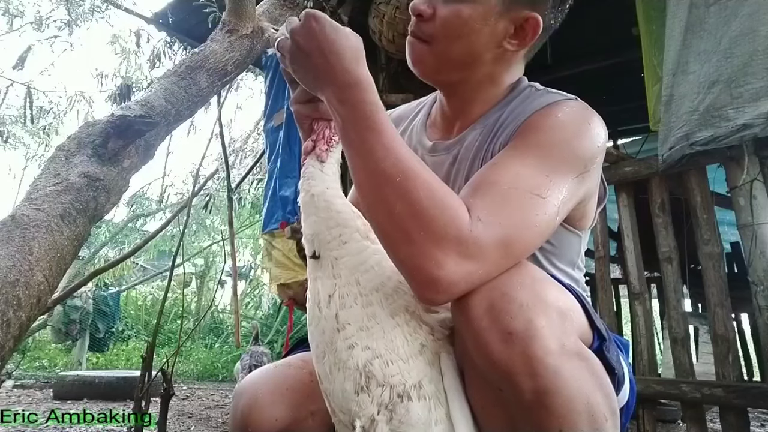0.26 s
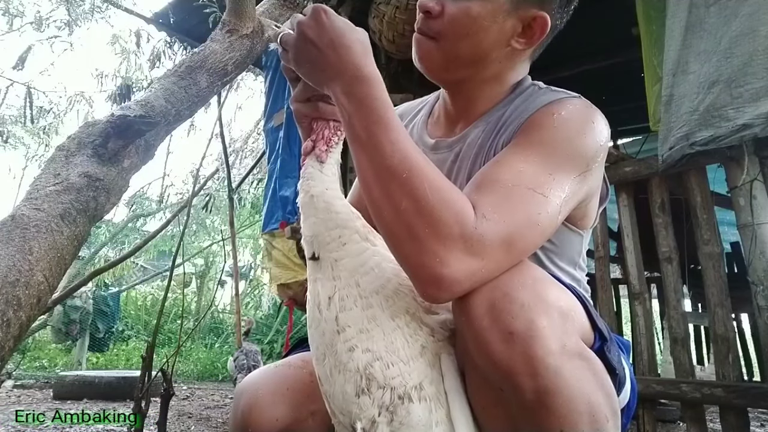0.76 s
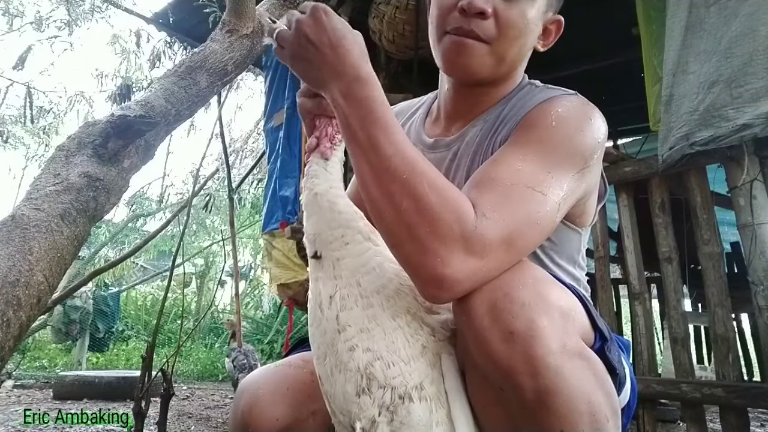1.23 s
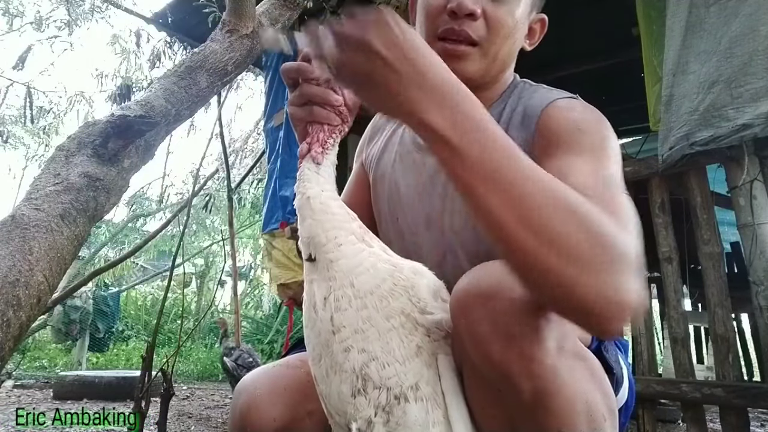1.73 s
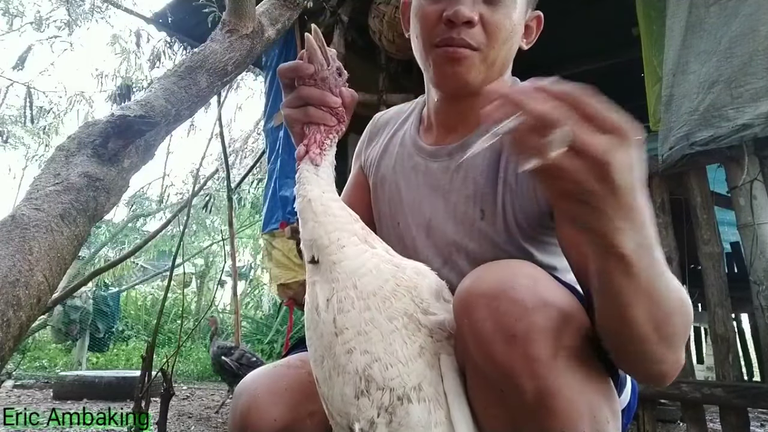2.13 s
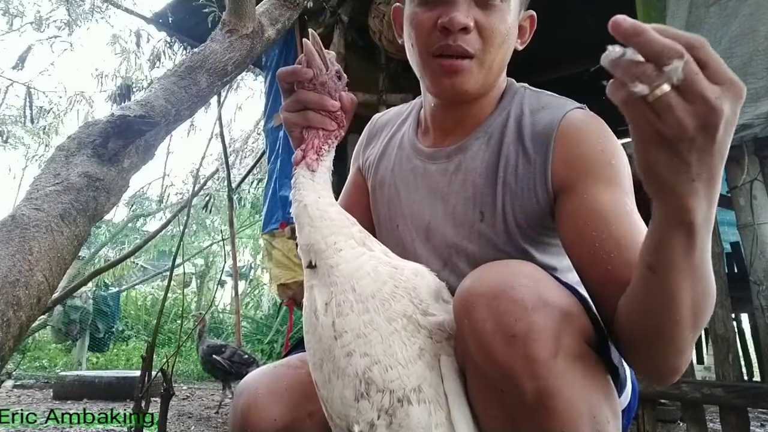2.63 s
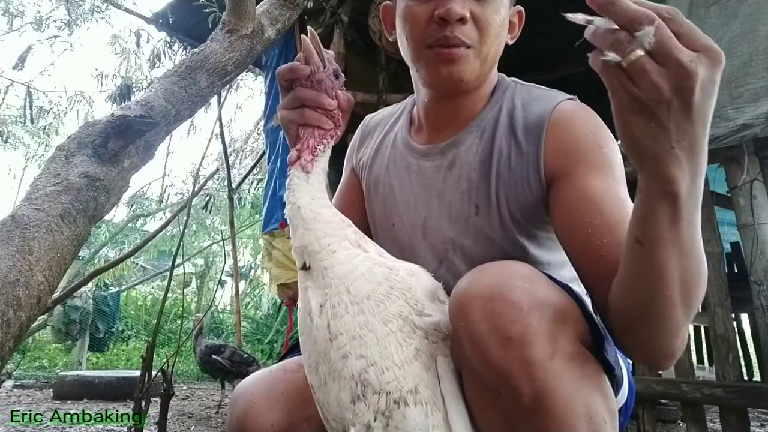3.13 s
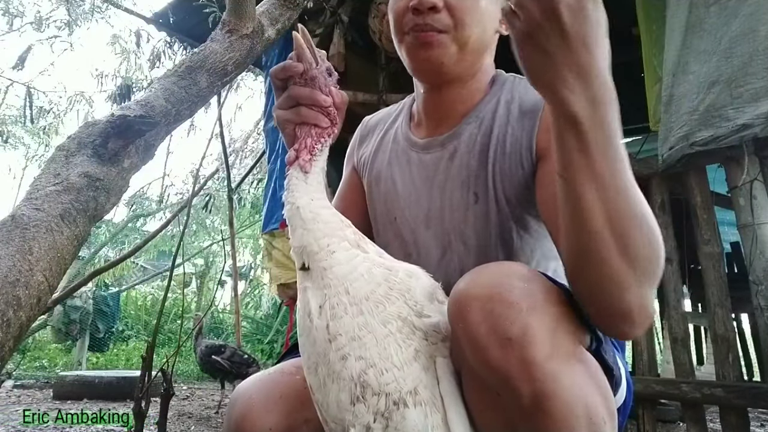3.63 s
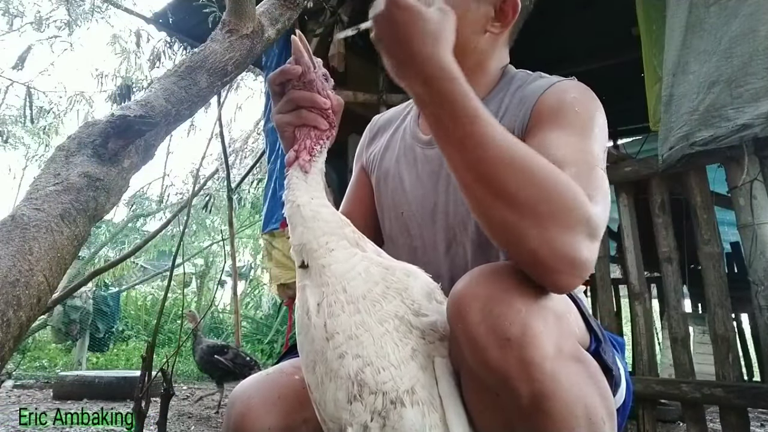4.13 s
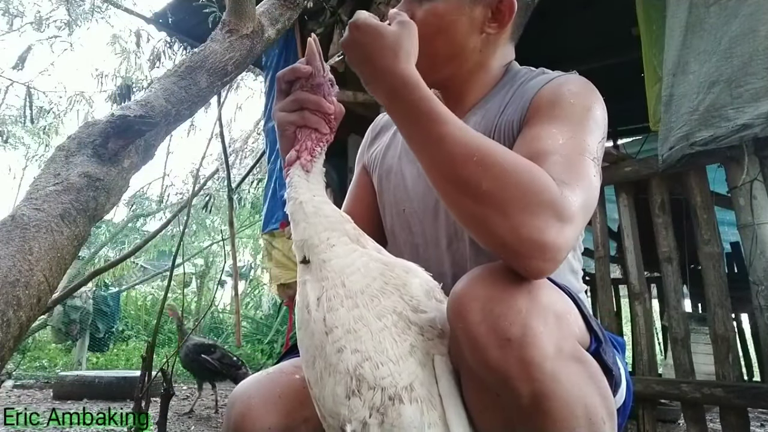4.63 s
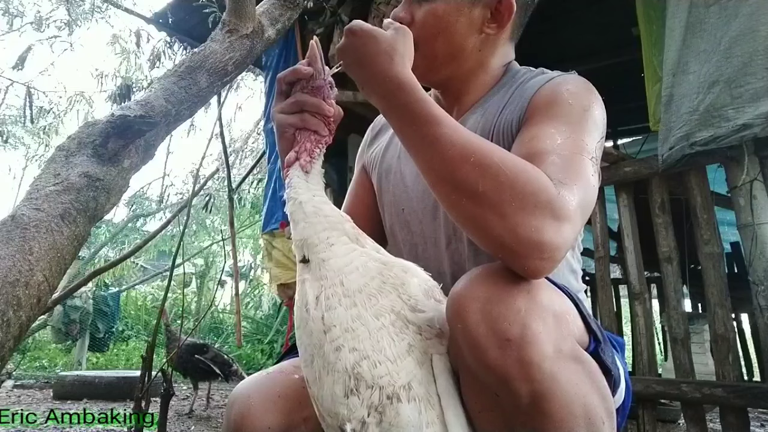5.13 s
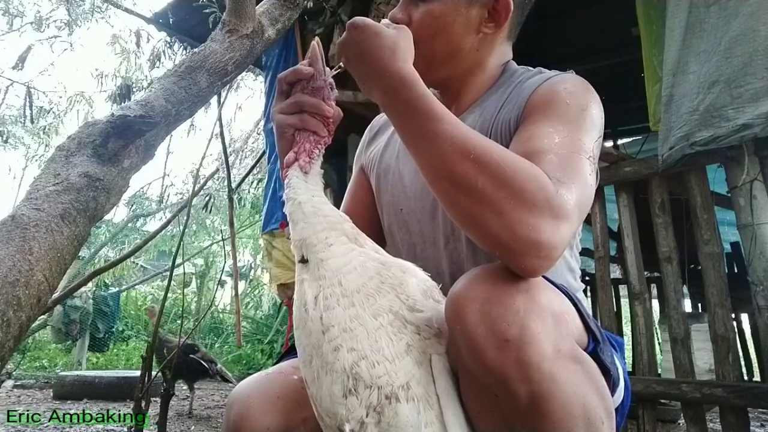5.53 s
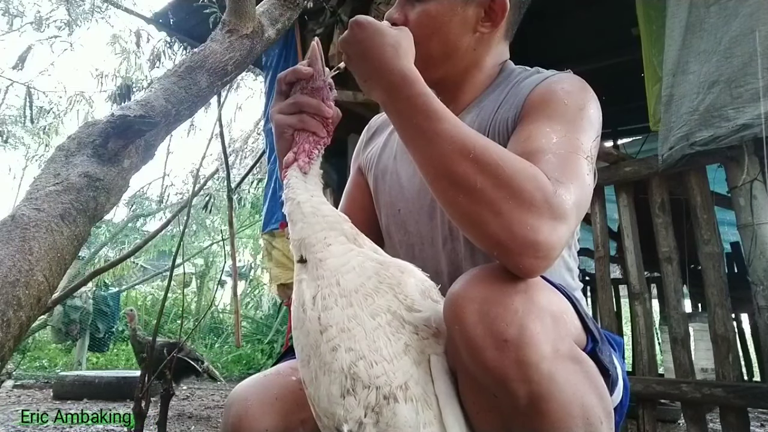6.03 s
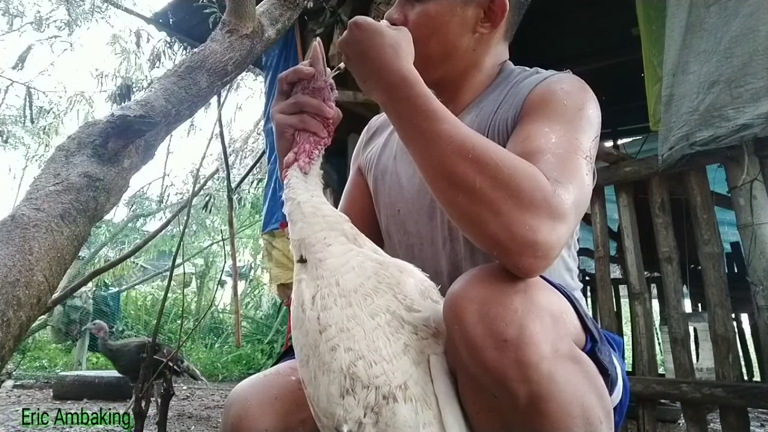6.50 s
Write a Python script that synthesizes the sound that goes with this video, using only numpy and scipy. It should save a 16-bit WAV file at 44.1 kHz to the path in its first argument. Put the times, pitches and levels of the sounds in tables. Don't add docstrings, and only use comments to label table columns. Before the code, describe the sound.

Outdoors in a backyard, steady rain hisses over a low rumble. A near turkey yelps in short bursts, each opening with a raspy puff, ringing into a whistle and breaking low. Farther hens chirp, pipe and cluck between, and a chick peeps thinly early on. Drops tick on leaves and tarp. Hand-held phone, close, slightly overloaded.

```python
import sys
import numpy as np
from scipy import signal
from scipy.fft import rfft, irfft
from scipy.io import wavfile
from scipy.ndimage import uniform_filter1d, minimum_filter1d

SR = 44100
rng = np.random.default_rng(int(sys.argv[2]) if len(sys.argv) > 2 else 0)


def makeup_ratio(level_db):
    decades = np.asarray(level_db, float) / 20
    return 10 ** decades


def to_wav(sig):
    pcm = np.clip(np.atleast_2d(sig), -1, 1) * 32767
    pcm = np.round(pcm).astype(np.int16)
    wavfile.write(sys.argv[1], SR, pcm.T)


N = 298116

# left_lag_samples, left_minus_right_db
PLACES = [
    (19, 1),
    (8, 3.5),
]


def read(table, hz):
    f, db = np.transpose(table)
    return np.interp(np.log(hz), np.log(f), db)


def band(x, lo_hz, hi_hz):
    sos = signal.butter(2, [lo_hz, min(hi_hz, .49 * SR)], "bandpass", fs=SR, output="sos")
    y = signal.sosfilt(sos, x)
    return y / np.sqrt(np.mean(y ** 2))


def walk(rate_hz, size=N):
    k = max(int(SR / rate_hz), 1)
    held = np.repeat(rng.standard_normal(size // k + 1), k)
    return 2.78 * uniform_filter1d(uniform_filter1d(held, k), k)[:size]


def add(out, start_s, sound, lag, pan_db):
    for ear, (late, db) in enumerate([(max(lag, 0), pan_db / 2), (max(-lag, 0), -pan_db / 2)]):
        i = int(start_s * SR + late)
        n = min(len(sound), N - i)
        out[ear, i:i + n] += makeup_ratio(db) * sound[:n]


def rain():
    # time_s, level_db
    shower_db = [
        (0.0, -53),
        (1.62, -53),
        (5.12, -52.5),
        (5.29, -50),
        (6.14, -54),
        (6.76, -50.5),
    ]
    # freq_hz, density_db
    rumble_db = [(15, -24), (25, -18), (43, -21.5), (63, -8), (87, 1), (329, -17.5), (367, -19)]
    # freq_hz, density_db
    hiss_db = [(764, -18), (1250, -21), (2450, -24.5), (3790, -33.5), (6890, -30.5), (10100, -40),
               (14700, -41.5), (16400, -23)]
    patter_per_s, patter_spread_db = 600, 4.0
    alike_hz, spectrum_db = 540, 39
    swell_db, flicker_db = .55, 1.1

    s, level_db = np.transpose(shower_db)
    shower = np.interp(np.arange(N) / SR, s, level_db)
    strength = makeup_ratio(patter_spread_db * np.minimum(rng.exponential(size=(2, N)), 5))
    hits = (rng.random((2, N)) < patter_per_s / SR) * strength
    patter = hits * rng.standard_normal((2, N))
    hiss = 0.46 * patter / patter.std() + rng.standard_normal((2, N))

    hz = np.maximum(np.fft.rfftfreq(N, 1 / SR), 1)
    alike = 1 / (1 + (hz / alike_hz) ** 2.26)
    common = rfft(rng.standard_normal(N))
    mix = np.sqrt(alike) * common + np.sqrt(1 - alike) * rfft(hiss / hiss.std())
    mix *= makeup_ratio(read(rumble_db + hiss_db, hz) + spectrum_db + shower.mean())

    gust = shower - shower.mean() + swell_db * walk(30)
    out = 0
    for step in np.arange(8, 30):
        share = np.clip(1 - abs(2 * np.log2(hz) - step), 0, 1)
        db = flicker_db * walk(25) + np.clip((step - 16) / 4, 0, 1) * gust
        out = out + makeup_ratio(db) * irfft(mix * share, N)
    return out


def call(rows, turn_db):
    # freq_hz, level_db
    beak = [(600, -22.5), (2000, -11), (3200, -24), (4600, -32), (6400, -25), (8500, -43.5), (15000, -64)]
    edge_s, burst_s, tail_db = .0043, .024, -15
    jitter, flutter_db, croak_db = .005, .6, -17
    bright_db_per_hz = .048

    s, *columns, starts = np.transpose(rows)
    t = np.arange(s[0] - edge_s, s[-1] + edge_s, 1 / SR)
    n = len(t)
    hz, first_db, second_db, third_db, brass_db, rasp_db = (np.interp(t, s, c) for c in columns)
    turn = turn_db[(t * SR).astype(int).clip(0, N - 1)]
    second_db = second_db + bright_db_per_hz * np.clip(hz - 1000, -120, 150) + turn
    third_db = third_db + turn
    since_s = t - starts[np.maximum(np.searchsorted(s, t) - 1, 0)] + edge_s

    phase = 2 * np.pi * np.cumsum(hz * (1 + jitter * walk(175.4, size=n))) / SR
    tone = np.sin(phase) + makeup_ratio(second_db + flutter_db * walk(184.0, size=n)) * np.sin(2 * phase)
    tone += makeup_ratio(third_db) * np.sin(3 * phase)
    tone += makeup_ratio(third_db - 7) * np.clip((3000 - 4 * hz) / 400, 0, 1) * np.sin(4 * phase)

    effort = makeup_ratio(first_db) * (1 + makeup_ratio(second_db))
    puff = uniform_filter1d(np.exp(-(since_s / burst_s) ** 4 / 2), size=90) + makeup_ratio(tail_db)
    burst = (1 + makeup_ratio(second_db)) * np.minimum(effort / 0.5, 1) * puff
    for k in range(4, 14):
        db = brass_db + read(beak, k * hz) + 3 * walk(229.7, size=n)
        tone += burst * makeup_ratio(db) * np.sin(k * phase) * (k * hz < .45 * SR)

    air = rfft(rng.standard_normal(n))
    air = irfft(air * makeup_ratio(read(beak, np.fft.rfftfreq(n, 1 / SR) + 1)), n)
    air = 0.83 * band(air * (1 + np.cos(phase)), 900, 17000)
    croak = makeup_ratio(third_db + croak_db) * np.clip((850 - hz) / 150, .2, 1)
    tone = np.sqrt(2) * tone + (burst * makeup_ratio(rasp_db) + croak) * air
    edge = np.clip(np.minimum(t - t[0], t[-1] - t) / edge_s, 0, 1) ** 2
    return t[0], tone * edge * makeup_ratio(first_db + flutter_db * walk(118.3, size=n))


def syllable(shape, start_s, length_s, from_hz, to_hz, level_db):
    join_s = .002
    return [(start_s + join_s + when * (length_s - 2 * join_s), from_hz + glide * (to_hz - from_hz),
             level_db + rel_db, *upper)
            for when, glide, rel_db, *upper in shape]


def phrases(bird, breath_s):
    parts = sorted((*row, shape, brass_db, rasp_db)
                   for rows, shape, brass_db, rasp_db in bird for row in rows)
    out, end = [], -1
    for (s, length, *rest, shape, brass_db, rasp_db), later in zip(parts, parts[1:] + [(99,)]):
        if s - end > breath_s:
            out.append([])
        end = s + length
        if breath_s > 0:
            end = min(end, later[0])
        out[-1] += [(*row, brass_db, rasp_db, s) for row in syllable(shape, s, end - s, *rest)]
    return out


def far_birds():
    # length_share, glide_share, level_db, second_minus_first_db, third_minus_first_db
    falls = [(0.02, .1, 1070, 1030, -46), (0.12, .055, 1030, 640, -44), (0.32, .04, 1200, 1120, -45),
             (0.54, .035, 1250, 1180, -45), (0.69, .05, 1050, 720, -46), (1.75, .11, 1130, 800, -46),
             (3.692, .028, 1420, 555, -30), (3.792, .02, 1360, 850, -31), (4.34, .055, 1170, 1060, -47),
             (4.385, .03, 680, 560, -45), (4.475, .04, 1180, 1130, -46), (4.668, .02, 770, 720, -44),
             (4.76, .055, 1160, 1130, -49), (6.232, .072, 1850, 1500, -45), (6.457, .03, 1250, 587, -34),
             (6.472, .03, 1870, 1720, -40)]
    fall = [(0, 0, 0, -20, -36), (.45, 0.25, 1, -18, -34), (1, 1, -3, -20, -30)]
    clucks = [(0.25, 0.019, 740, 804, -40), (0.482, 0.018, 710, 840, -37.5),
              (1.885, 0.032, 652, 870, -36.5), (3.4, 0.0086, 398, 412, -36.5),
              (4.455, 0.018, 706, 860, -38), (5.08, 0.031, 874, 920, -48), (6.135, 0.022, 892, 945, -44.5)]
    cluck = [(0, 0.1, 5.5, 3, -7), (.35, 0.18, 2, -7.5, -26), (0.999, 0.88, 6.5, -1, -37)]
    chirps = [(0.255, 0.024, 1090, 1260, -42), (1.006, 0.072, 866, 1266, -30.5),
              (2.102, 0.027, 848, 1324, -21), (2.19, 0.022, 754, 1100, -29),
              (3.677, 0.013, 1089, 1435, -21.5), (3.722, 0.026, 684, 900, -38),
              (3.748, .045, 876, 1380, -23.5), (6.385, 0.083, 809, 1370, -29),
              (6.445, 0.022, 1640, 1800, -34.5)]
    chirp = [(0, 0, -6, -20, -28), (.45, .22, 3, -18, -26), (.7, .45, -2, -20, -26), (.9, .9, -1, -20, -26),
             (1, 1, -5, -22, -28)]
    pipes = [
        (0.748, 0.15, 929, 990, -35.5),
        (3.47, 0.16, 964, 1048, -31.5),
        (6.158, 0.16, 932, 1004, -35),
    ]
    pipe = [(0, -4, 5.5, -21, -35), (.13, -3, -1.5, -1, -35), (.17, -0.5, 7, -19, -40),
            (0.598, 0.25, 8, -14, -40), (.92, 1, 5, -38, -16), (0.998, 1, 2, -34, -31)]
    helds = [
        (0.958, 0.0371, 630, 715, -34.5),
        (1.905, 0.13, 888, 994, -22),
    ]
    held = [(0, 0.079, -13, -3, -18), (.4, .5, -4, -2, -26), (1, 1, -3, -9, -33)]
    putts = [
        (6.495, .042, 650, 580, -19.5),
        (5.05, 0.0176, 1600, 700, -29.5),
        (6.624, 0.017, 774, 600, -23.5),
        (6.592, 0.0082, 1500, 1900, -36),
    ]
    putt = [(0, 0.13, -3, -16, -22), (.22, .1, 3, 0.5, -11), (.5, 0, -7.5, -8, -30), (1, 1, -13, -2, -30)]
    # events, shape, brass_db, rasp_db
    voices = [(pipes, pipe, -20, -16), (chirps, chirp, -22.5, -7), (falls, fall, -20, -14),
              (clucks, cluck, -14, -10), (helds, held, -20, -20), (putts, putt, -20, -16)]
    out = np.zeros((2, N))
    for rows in phrases(voices, -9):
        add(out, *call(rows, np.zeros(N)), *PLACES[1])
    return out


def chick():
    # start_s, length_s, pitch_hz, level_db
    peeps = [(0.413, 0.094, 7200, -47), (0.718, .06, 7470, -50), (0.812, .05, 6320, -47),
             (1.157, 0.081, 7120, -44), (1.615, 0.076, 7170, -45), (1.698, 0.064, 7040, -46),
             (2.25, .085, 7120, -48), (2.336, 0.045, 7370, -45)]
    out = np.zeros((2, N))
    for start_s, length_s, pitch_hz, level_db in peeps:
        n = int(length_s * SR)
        hz = pitch_hz * (1 + .007 * walk(250, size=n))
        level = np.hanning(n) ** 0.082 * makeup_ratio(level_db + 2.3 * walk(79, size=n))
        add(out, start_s, np.sin(2 * np.pi * np.cumsum(hz) / SR) * level, 10, -7)
    return out


def splash(start_s, peak_db, low_db, pan_db, hz, t60_s, rise_s):
    t, out = np.arange(SR // 5) / SR, np.zeros((2, N))
    noise = rng.standard_normal((2, len(t)))
    bright = band(noise[0], hz / 3.7, hz * 1.4)
    knock = band(band(noise[1], 331, 1720), 246, 1900)
    decay = makeup_ratio(-60 * t / t60_s) * np.clip(t / rise_s, 0, 1)
    add(out, start_s, makeup_ratio(peak_db + 6.5) * (bright + makeup_ratio(low_db) * knock) * decay, -2.5 * pan_db, pan_db)
    return out


def drops():
    # start_s, peak_db, low_minus_peak_db, left_minus_right_db
    leaf_drops = [(0.5252, -48, -12, 12), (0.5894, -49.5, 15.5, 3), (0.6994, -48.5, 14, 6.5),
                  (0.9203, -47, -10, -13), (1.6054, -40, -5, 5), (1.8956, -46, 3, 7), (2.0574, -62, 8, 6),
                  (2.0867, -51, 19, 5), (2.2655, -47, -13, 9), (2.4006, -41.5, -7, 5.5),
                  (2.785, -39, -23, 6.5), (2.9966, -43.5, -11, 2), (3.2599, -43.5, 19, 3.5),
                  (3.3323, -46, -16, 5.5), (3.4016, -40, -11, 9), (3.427, -48, 23, 7),
                  (4.0051, -44.5, 20, 5), (4.1599, -48, 12, 5), (4.3814, -54.5, 21.5, 5),
                  (4.5374, -57, 23.5, 4), (5.4924, -45, -13, 7), (5.7618, -58, -5, 3), (5.8431, -49, 3, 6),
                  (5.892, -45, -10, 9), (6.115, -60, 22, 3), (6.33, -54, 7, 0), (6.376, -49, 24.5, 4.5),
                  (6.539, -51, 11, 1)]
    ticks = [
        (2.4793, -37.5, -14, 7.7),
        (2.8564, -41, 5, 2.8),
        (2.9168, -45, -5, 4.5),
        (6.264, -43, 9, 6.1),
    ]
    spills = [(1.8395, -50, 6, 8), (2.1895, -48.5, 8, 11), (3.1123, -52.5, 7, 9), (4.0681, -49.5, 7.5, 9.5),
              (4.811, -53, -16, 6), (4.8306, -45.5, 5.5, 9.5), (4.8596, -48.5, 4, 7),
              (5.7986, -62, -15, 13), (5.8427, -60.5, 17, 5.5), (6.0493, -46.5, 7.5, 6),
              (6.4107, -47.5, 8.5, 7)]
    out = np.zeros((2, N))
    for rows, hz in [(leaf_drops, 6300), (ticks, 15000)]:
        for row in rows:
            out += splash(*row, hz, .016, .0002)
    for row in spills:
        out += splash(*row, 5500, .15, .00029)
    return out


def dips(x):
    # port (0 left, 1 right), centre_hz, width_hz
    bands = [
        (0, 1125, 130),
        (1, 1030, 120),
        (0, 1000, 300),
        (0, 2150, 500),
    ]
    # time_s, then one depth_share (0-1) per band
    depth_share = [(2, 0.77, 0.85, 0.0082, .4), (2.199, 0, 0.33, 0.8, 0.38), (2.9, 0.078, 0, .75, 0.5),
                   (3.2, 0.17, 0.32, 0, 0.29), (4.5, .75, .7, 0, 0.47)]
    s, *depths = np.transpose(depth_share)
    out = x.copy()
    for depth, (port, hz, width) in zip(depths, bands):
        lost = signal.lfilter(*signal.iirpeak(hz, hz / width, fs=SR), out[port])
        out[port] -= np.interp(np.arange(N) / SR, s, np.clip(depth, 0, 1)) * lost
    return out


def near_bird():
    # length_share, glide_share, level_db, second_minus_first_db, third_minus_first_db
    soft_puffs = [
        (0.929, 0.026, 600, 780, -18.5),
        (5.029, 0.023, 635, 776, -16.5),
        (6.601, 0.024, 641, 800, -14.5),
    ]
    soft_puff = [(0, 0, -2, -12, -18), (.25, .4, 1, -3, -8), (.55, .8, 0, 2, -4), (.8, .95, -3, 4, -2),
                 (1, 1, -8, 4, -5)]
    puffs = [
        (1.262, 0.025, 936, 1087, -8),
        (1.48, 0.024, 867, 1174, -5.5),
        (2.627, 0.016, 767, 1045, -5.5),
    ]
    puff = [(0, 0, -6, -3, -20), (.22, .22, 0, 4, -15), (.5, .48, -1.5, 4, -17), (.72, .75, -1, 5, -17),
            (1, 1, -6, 1, -20)]
    low_puffs = [
        (5.331, 0.02, 751.5, 788, -12),
        (5.542, 0.018, 651, 817, -12.5),
    ]
    low_puff = [(0, 0, -3, -4, -12), (.25, 0.24, 0.5, 6.5, 1.5), (.55, 0.95, -2, 6.5, -6.5),
                (1, 1, -9, 11.5, -15)]
    rings = [(0.955, 0.028, 1106, 970, -25.5), (1.286, 0.047, 1127, 1064, -15.5),
             (1.504, 0.015, 1232, 1152, -22), (2.645, 0.022, 1222, 1194, -17),
             (5.053, 0.033, 1106, 900, -23.5), (5.353, 0.036, 1131, 1088, -18),
             (5.564, 0.018, 1235, 1140, -25.5), (6.625, 0.038, 1130, 1018, -16)]
    ring = [(0, 0, 9, -21, -19), (.4, .5, -6.5, -5.5, -39), (1, 0.92, -7, -15, -26)]
    whistles = [(0.985, 0.16, 1010, 884, -23), (2.38, 0.078, 1118, 1049, -14.5),
                (2.47, .06, 1023, 918, -19), (3.49, 0.077, 1030, 953, -18), (5.115, 0.115, 946, 863, -27),
                (6.67, 0.092, 1045, 933, -22)]
    whistle = [(0, 0.12, -1, -12.5, -32), (.3, .2, 0, -9, -27), (.7, .6, 0, -2.5, -26.5),
               (1, 0.9, 0.32, -4, -22)]
    arches = [(1.322, 0.057, 1068, 810, -24.5), (1.545, 0.054, 1087, 893, -23.5),
              (2.672, 0.076, 1146, 900, -18.5), (5.39, 0.047, 1017, 876, -27),
              (5.622, 0.033, 1039, 885, -25)]
    arch = [(0, 0, -0.5, -15, -29), (.4, .1, 2.5, -9, -35), (.7, .3, 4, -7.5, -31), (1, 0.82, -3.5, 1, -22)]
    breaks = [(1.145, 0.037, 841, 580, -19), (1.383, 0.022, 813, 560, -20.5), (1.6, 0.017, 794, 565, -27),
              (2.53, 0.036, 790, 568, -19), (2.744, 0.021, 880, 555, -20), (5.226, .036, 827, 560, -22.5),
              (5.443, 0.019, 766, 549, -24), (5.667, 0.011, 744, 540, -33.5)]
    low_break = [(0, 0, 5, -15, -26), (.2, .45, 3.5, 4.5, -20), (.36, 0.74, 2, 5.5, -10),
                 (.7, 0.89, 0.5, 7, -6), (1, 0.98, -8, -4, 2)]
    swells = [
        (2.324, 0.047, 932, 943, -18),
        (3.406, 0.092, 908, 1034, -17.5),
        (3.566, 0.0166, 1040, 1500, -31),
    ]
    swell = [(0, 0.042, -1.14, -18, -36.5), (0.351, 0.348, -1.5, -11.5, -38), (1, 1, 0, -17.5, -30)]
    low_swells = [
        (2.279, 0.041, 650, 751.5, -20),
        (3.368, 0.033, 670, 768, -27),
    ]
    low_swell = [(0, 0.1, -2, -8, -14), (.5, 0.4, -1, -6, -14), (.85, .9, 0, -4, -16), (1, 1, -3, -8, -22)]
    croons = [
        (3.598, .12, 681.5, 783, -15),
    ]
    croon = [(0, 1.35, -14, -15, -25), (.2, 0.15, -8.5, 6, -16), (.4, 0.01, -6.5, 2, -12),
             (0.621, 0.9, 2.5, 3, -26), (.7, .6, -7, 1, -18), (.9, 0.082, -11, 4, -19),
             (1, -0.67, -7.5, -10, -21)]
    # time_s, upper_partials_db, left_minus_right_db
    head = [(0.932, 6, -3.5), (1.049, -4, -3), (1.16, 0.5, -1.5), (1.27, -1, 0.5), (1.5, -5.5, -1),
            (2.3, -4, 8.5), (2.43, -8, -1.5), (2.521, 2.5, 2), (2.64, -1, -1), (2.72, -3.5, 1.5),
            (3.45, -5, -3), (3.66, -2.5, 0), (5.04, 3, 0.5), (5.17, -5, -2.5), (5.35, 3, 0),
            (5.6, -1, -0.5), (6.62, 1.5, -1.5), (6.72, -8.5, -3.5)]
    # events, shape, brass_db, rasp_db
    yelper = [(puffs, puff, -7, -12.5), (low_puffs, low_puff, -19, -7), (rings, ring, -18, -14.5),
              (whistles, whistle, -12, -30), (arches, arch, -16, -32), (breaks, low_break, -11, -13),
              (swells, swell, -21, -32), (low_swells, low_swell, -20, -20),
              (soft_puffs, soft_puff, -19, -8)]
    croon_part = [(croons, croon, -7, -2.5)]
    breath_s = .026

    s, *turns = np.transpose(head)
    turn_db, pan_db = (np.interp(np.arange(N) / SR, s, c) for c in np.clip(turns, -10, 2.5))
    out = np.zeros((2, N))
    for rows in phrases(yelper, breath_s) + phrases(croon_part, breath_s):
        add(out, *call(rows, turn_db), *PLACES[0])
    return dips(out) * makeup_ratio(np.array([pan_db, -pan_db]) / 2)


def poultry():
    out = near_bird() + far_birds()
    shade = signal.lfilter(*signal.butter(1, 1500, fs=SR), out[0])
    out[0] = .62 * out[0] + .45 * shade
    out[1] *= makeup_ratio(1.2)
    return out + chick()


def scatter(t60_s, level_db, start_s):
    t = np.arange(SR // 3) / SR
    echoes = rng.standard_normal((2, len(t))) * makeup_ratio(-60 * t / t60_s) * (t > start_s)
    return echoes * makeup_ratio(level_db) / np.sqrt(np.sum(echoes ** 2, axis=1, keepdims=True))


def scene():
    near = poultry() + drops()
    echoes = scatter(.045, -13, .0006) + scatter(.16, -15, .00019)
    return near + signal.fftconvolve(near, echoes, axes=1)[:, :N] + rain()


def holes(x):
    from_hz, hole_share = 9500, .13
    hz, _, z = signal.stft(x, SR, window="cosine", nperseg=2048, noverlap=1024)
    power = uniform_filter1d((np.abs(z) ** 2).sum(axis=0), size=2, axis=1)
    strip = uniform_filter1d(power, size=6, axis=0) / uniform_filter1d(power, size=80, axis=0)
    share = hole_share * np.interp(hz, [from_hz - 1500, from_hz, 12500, 15000], [0, .4, 1, .2])
    rank = np.argsort(np.argsort(strip, axis=None)).reshape(strip.shape) / strip.size
    weak = -minimum_filter1d(-1. * (rank < share[:, None]), size=4, axis=0)
    return signal.istft(z * (1 - weak), SR, window="cosine", nperseg=2048, noverlap=1024)[1][:, :N]


def top_cut(x):
    return signal.sosfilt(signal.butter(12, 16560, fs=SR, output="sos"), x)


def record(dry):
    low_pass = signal.ellip(14, .2, 95, 15500, fs=SR, output="sos")
    cut = signal.sosfilt(low_pass, holes(dry))
    return top_cut(np.clip(cut, -1, 1))


dry = scene()
out = record(dry)
to_wav(out)
```